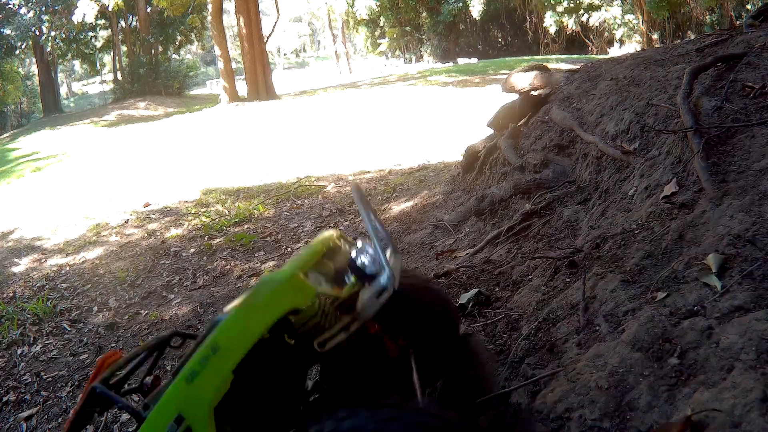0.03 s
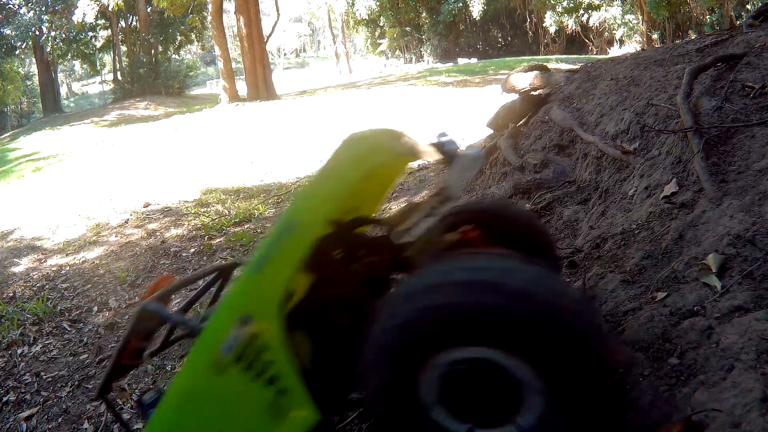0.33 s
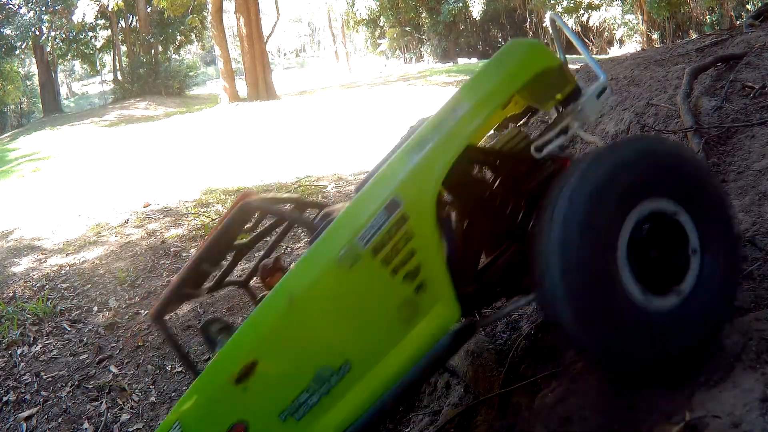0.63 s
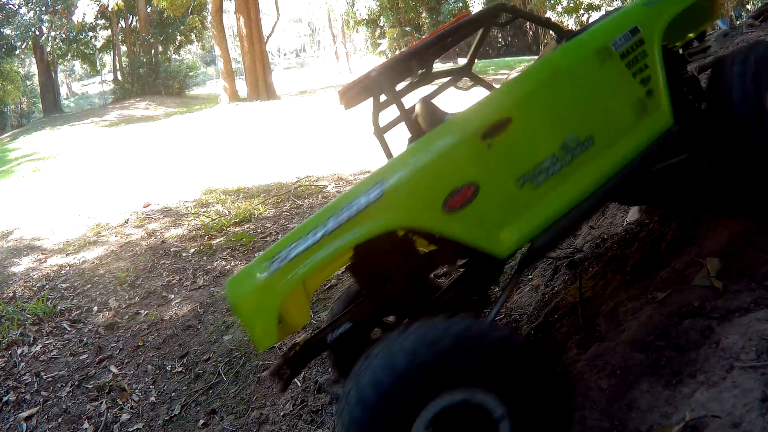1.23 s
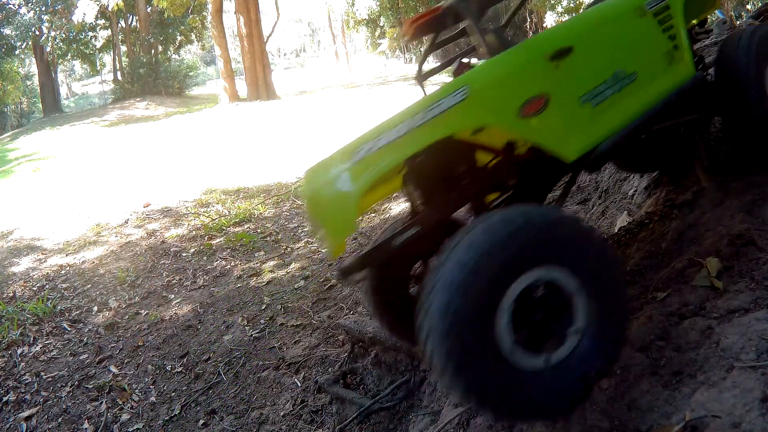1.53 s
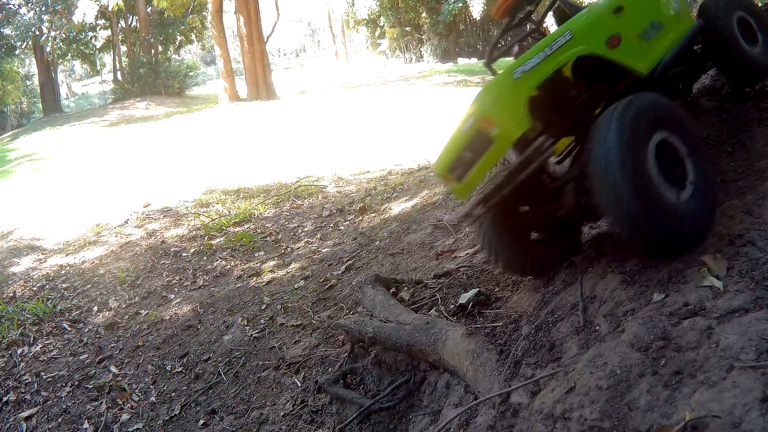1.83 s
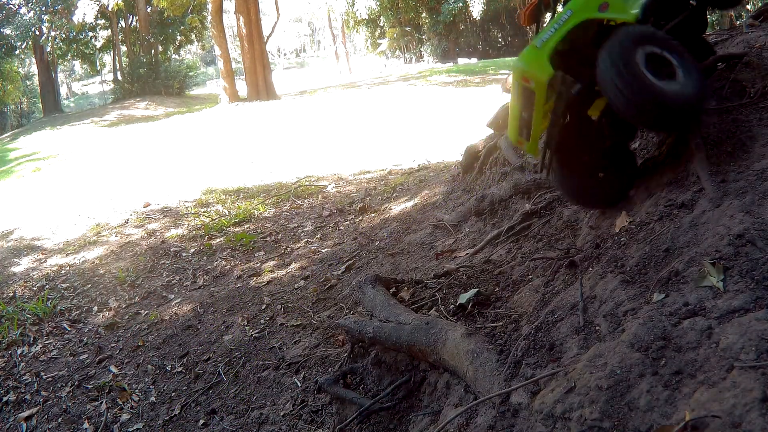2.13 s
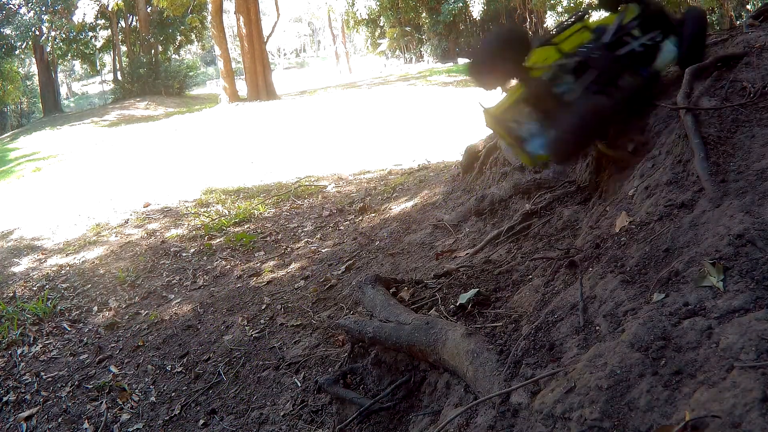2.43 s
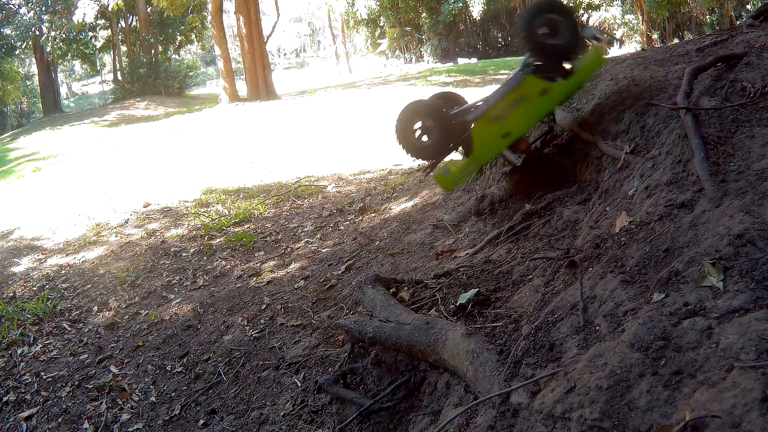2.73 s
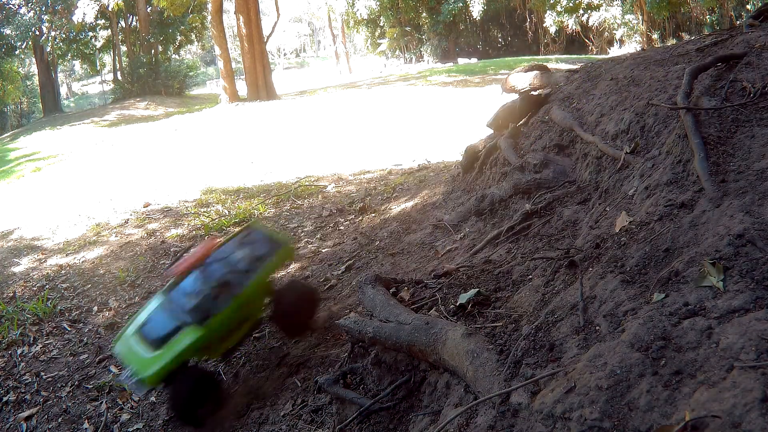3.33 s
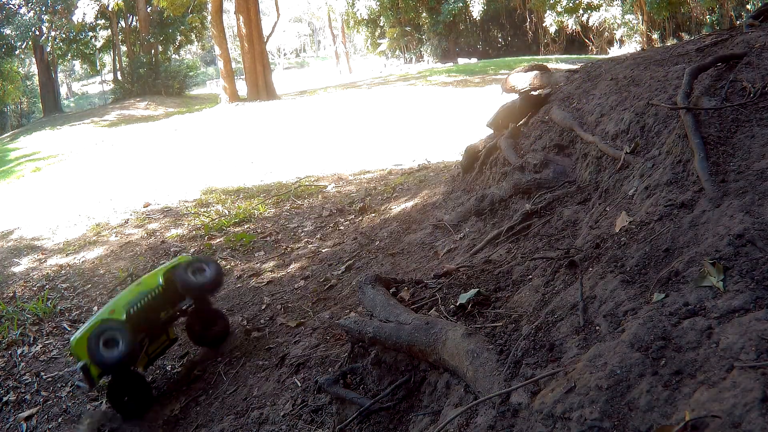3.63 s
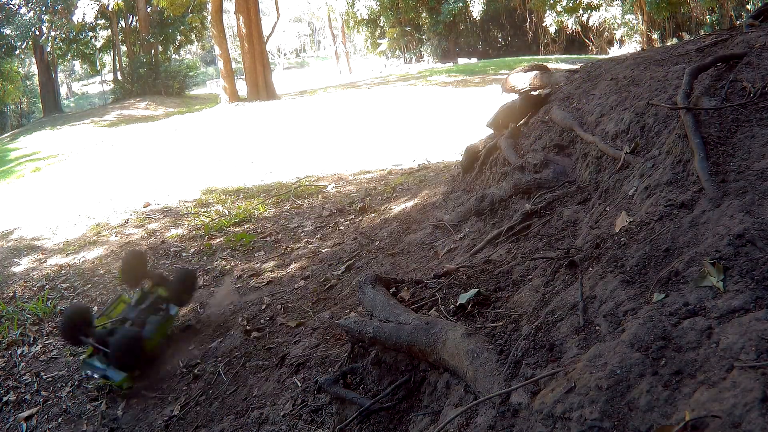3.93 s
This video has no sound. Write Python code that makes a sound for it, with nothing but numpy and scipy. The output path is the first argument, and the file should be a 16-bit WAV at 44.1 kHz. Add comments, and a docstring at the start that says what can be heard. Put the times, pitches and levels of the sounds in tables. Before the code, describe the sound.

A toy truck climbs a dirt bank outdoors, its faint gear whine wavering in pitch over crackling grit, light rattles and a few knocks, with a brief tyre hoot near 1.4 seconds. At about 2.4 seconds it flips with a loud thud and the whine stops. Thuds and plastic clacks follow, loudest around 2.6 seconds, then again near 3.2 and 3.8, over a faint distant hum.

```python
"""Toy truck on a dirt bank

Outdoors among trees, in mono: a radio-controlled truck crawls up a bank, flips and tumbles back down.
Its gears whine and sag under load, the tyres scrabble and squeak, the chassis knocks and rattles;
then tyres thud and the plastic shell clacks on the ground. Bank and trees send faint reflections
to the microphone, and a far hum lies under the open air."""
import sys
import numpy as np
from scipy import signal
from scipy.fft import rfft, irfft
from scipy.io import wavfile
from scipy.ndimage import uniform_filter1d

SR = 44100
rng = np.random.default_rng(int(sys.argv[2]) if len(sys.argv) > 2 else 0)


def int16_out(signal):
    """Quantize to a 16-bit WAV file."""
    q = np.round(np.clip(np.atleast_2d(signal).T, -1, 1) * 32767)
    wavfile.write(sys.argv[1], SR, q.astype(np.int16))


N = 176400
T = np.arange(N) / SR

# how hard the drive works, heard in rasp and grit: (time [s], level [dB])
DRIVE_LEVEL = [(0, -59), (.3, -57), (.6, -58), (.78, -65), (1.18, -57.5), (1.33, -70.5), (1.76, -60),
               (2.1, -68.5), (2.38, -61), (2.68, -62), (2.8, -70.5), (3.15, -77.5), (3.65, -63), (4, -63)]
# tyres and chassis hit the ground: (time [s], level [dB], pitch [factor])
LANDINGS = [(.595, -32, 1.16), (0.621, -33, 0.88), (.762, -35.5, 0.96), (1.198, -33, 1), (2.397, -29, 0.95),
            (2.409, -24.5, 1.06), (2.426, -18, 0.98), (2.435, -19, 0.9), (2.587, -27.5, 0.91),
            (2.597, -26.5, 0.85), (2.621, -20.5, 0.85), (2.637, -19, 1.044), (2.691, -29, 1.57),
            (2.928, -29, 0.98), (3.207, -20.5, 1.156), (3.217, -20.5, 0.94), (3.269, -32.5, 1),
            (3.439, -36.5, 1.09), (3.79, -22.5, 0.96), (3.801, -21, 0.77), (3.825, -20.5, 1.21),
            (3.844, -21.5, 1.05), (3.86, -28, 1.005)]


def from_db(db):
    """Decibels to gain."""
    return 10 ** (np.asarray(db) / 20)


def unit_power(x):
    """Scale to an RMS of 1."""
    return x / np.sqrt(np.mean(x ** 2) + 1e-20)


def curve(rows):
    """Join (time, value) points, sample by sample."""
    return np.interp(T, *np.transpose(rows))


def drift(per_s):
    """Random wander with an RMS of 1."""
    count = int(per_s * T[-1]) + 2
    return unit_power(np.interp(T * per_s, np.arange(count), rng.standard_normal(count)))


def butter(x, hz, kind="low", order=2):
    """Butterworth filter, by default a gentle low-pass."""
    return signal.sosfilt(signal.butter(order, hz, kind, fs=SR, output="sos"), x)


def colour(x, spectrum):
    """Causal filter that follows a spectrum and rolls off beyond its ends; unit power out."""
    hz, db = np.transpose(spectrum)
    f = np.maximum(np.fft.rfftfreq(2 * N, 1 / SR), 1)
    rolloff = np.minimum(f / hz[0], 1) * np.minimum(hz[-1] / f, 1)
    gain = from_db(np.interp(np.log(f), np.log(hz), db)) * np.maximum(rolloff, 1 / 20) ** 2
    cepstrum = irfft(np.log(gain))
    minimum_phase = np.exp(rfft(2 * cepstrum[:N], 2 * N))
    return unit_power(irfft(rfft(x, 2 * N) * minimum_phase)[:N])


def noise(spectrum):
    """Coloured noise of unit power."""
    return colour(rng.standard_normal(N), spectrum)


def grains(per_s, spread_db):
    """Random clicks of uneven size."""
    hits = rng.random(N) < per_s / SR
    sizes = from_db(spread_db * np.minimum(rng.exponential(1, N), 4))
    return hits * sizes * rng.choice([-1, 1], N)


def add(out, start, x):
    """Mix a sound in at a time in seconds."""
    i = max(int(start * SR), 0)
    out[i:i + len(x)] += x[:max(N - i, 0)]


def ring(modes, pitch, uneven_db=2.5):
    """One blow on a set of decaying modes, each struck a little unevenly."""
    t = T[:SR // 6]
    out = np.zeros(len(t))
    for k, (hz, db, t60) in enumerate(modes):
        decay = from_db(db + uneven_db * rng.normal() - 60 * t / t60)
        out += (-1) ** k * decay * np.sin(2 * np.pi * hz * pitch * t)
    return out


def bursts(rows, rise_s=0.0012):
    """Envelope of quick starts that die away."""
    t = T[:SR // 6]
    out = np.zeros(N)
    for start, db, t60 in rows:
        add(out, start, from_db(db - 60 * t / t60) * np.minimum(t / rise_s, 1))
    return out


def drivetrain():
    """Gears whine over a rasp, louder under load; upper partials flare on the gearbox's resonances."""
    # gear whine, sagging whenever a tyre grips: (time [s], pitch [Hz])
    gear_pitch = [(.03, 1420), (.055, 1250), (.085, 1410), (.125, 1310), (.148, 1160), (.18, 1480),
                  (.225, 1290), (.275, 1520), (.32, 1190), (.36, 1420), (.40, 1200), (.455, 1340),
                  (.487, 1160), (.515, 1450), (.545, 1290), (.575, 1480), (.612, 950), (.65, 1060),
                  (.685, 870), (.77, 780), (.835, 900), (.92, 850), (.975, 1070), (1.04, 1110),
                  (1.07, 1380), (1.135, 920), (1.18, 1390), (1.21, 1170), (1.235, 830), (1.35, 600),
                  (1.48, 750), (1.535, 910), (1.56, 880), (1.605, 1120), (1.65, 1120), (1.675, 990),
                  (1.705, 1270), (1.74, 1340), (1.76, 1250), (1.81, 1400), (1.845, 1170), (1.91, 1360),
                  (1.96, 1230), (2.08, 1340), (2.18, 1240), (2.32, 1380), (2.36, 1150)]
    # strength of the whine: (time [s], level [dB])
    whine_level = [(0, -63), (.1, -56.5), (.3, -56), (.46, -52), (.56, -59), (.65, -52), (.75, -63.5),
                   (1.11, -52.5), (1.22, -55.5), (1.35, -70), (1.55, -54), (1.67, -54), (1.8, -62),
                   (2.35, -66.5)]
    # gearbox resonances: (frequency [Hz], relative level [dB])
    gearbox = [(900, -23), (1500, -0.5), (2620, -5), (2970, -10), (4100, -5), (4990, -2.5), (5780, -10),
               (6690, 0), (8880, -15.5), (11000, -8.5), (15500, -25)]
    jitter, wobble_rad, flutter_db = 0.01391, 0.33, 4
    pinion_teeth, db_per_sag, motor_stop_s = 12, 18, 2.55
    gear_hz = uniform_filter1d(curve(gear_pitch), size=500)
    sag = np.clip(1 - gear_hz / uniform_filter1d(gear_hz, size=6000), -.12, .12)
    unsteady_hz = gear_hz * (1 + jitter * (drift(200) + .5 * drift(20)))
    phase = 2 * np.pi * np.cumsum(unsteady_hz) / SR

    def partial(ratio):
        return from_db(flutter_db * drift(70)) * np.sin(ratio * phase + wobble_rad * drift(500))

    whine = unit_power(from_db(db_per_sag * sag) * partial(1) + from_db(-11.5) * partial(2))
    mesh = np.zeros(N)
    for k in range(32, 112, 4):  # the shaft adds weaker lines between the gears' upper partials
        line_db = -6.5 if k % pinion_teeth else 0
        mesh += from_db(line_db + flutter_db * drift(20)) * partial(k / pinion_teeth)
    mesh = from_db(-3.5) * colour(mesh, gearbox)
    rasp = from_db(-4 + flutter_db * drift(70)) * noise(gearbox)
    running = np.clip((motor_stop_s - T) * 10, 0, 1)  # the tones stop, the rasp goes on
    whine *= running * from_db(curve(whine_level))
    return whine + from_db(curve(DRIVE_LEVEL)) * (rasp + running * mesh)


def rattle():
    """Small jolts shake the chassis."""
    # strength of the shaking: (time [s], level [dB])
    shake_level = [(0, -45), (.62, -42), (.82, -50), (1.18, -39), (1.35, -51.5), (1.6, -46.5), (2.1, -53.5),
                   (2.47, -39), (2.57, -48), (2.68, -34.5), (2.77, -57), (2.87, -43), (3.18, -58),
                   (3.26, -39), (3.41, -58.5), (3.445, -41.5), (3.58, -49.5), (3.76, -51.5), (3.87, -38.5),
                   (4, -58)]
    # the chassis' answer to a jolt: (frequency [Hz], relative level [dB])
    jolt_spectrum = [(70, -20.5), (140, -10), (220, -4), (300, 1.5), (400, -1), (520, -10.5), (1300, -28),
                     (4000, -41.5)]
    return from_db(curve(shake_level)) * colour(grains(per_s=600, spread_db=2.5), jolt_spectrum)


def dirt():
    """Stones tick on the truck, grit crackles under the tyres, landings and skids shove soil."""
    # stone strikes: (time [s], level [dB], t60 [s])
    ticks = [(.043, -48, 0.24), (.086, -43, 0.017), (.213, -45, 0.02), (.266, -41.5, 0.022),
             (.377, -43, 0.042), (1.093, -41.5, 0.02), (1.615, -47, 0.028), (3.8, -51.5, 0.17),
             (3.93, -47, .023)]
    # stones and grit: (frequency [Hz], relative level [dB])
    stone_spectrum = [(2500, -14), (4200, -1.5), (5200, 0), (7500, -0.5), (10000, -6), (12500, -3),
                      (15000, -35)]
    # the truck slides: (time [s], length [s], level [dB])
    skids = [(2.474, 0.093, -49.5), (3.218, 0.043, -46.5), (3.778, 0.09, -45.5)]
    # shoved soil: (frequency [Hz], relative level [dB])
    soil_spectrum = [(400, -11), (750, 0.5), (1100, -17.5), (2400, -28.5)]
    grit_db, scuff_db, scuff_t60_s = -7, -20.5, 0.047
    grit = colour(grains(per_s=260, spread_db=4), stone_spectrum)
    grit *= from_db(curve(DRIVE_LEVEL) + grit_db)
    shove = bursts([(start, db + scuff_db, scuff_t60_s) for start, db, _ in LANDINGS])
    for start, length, db in skids:
        add(shove, start, from_db(db) * np.hanning(int(length * SR)))
    return noise(stone_spectrum) * bursts(ticks) + grit + noise(soil_spectrum) * shove


def outdoors():
    """Still air around the microphone and a far, wavering hum."""
    # open air: (frequency [Hz], relative level [dB])
    air_spectrum = [(25, -5.5), (75, -1.5), (140, -6), (368, -3), (703, -18.5), (1200, -16.5), (3000, -29),
                    (11800, -35.5), (15500, -44)]
    air_db, hum_db, hum_hz = -53, -57.5, 91.95
    hum = np.sqrt(2) * np.sin(2 * np.pi * np.cumsum(hum_hz + 1.84 * drift(8.08)) / SR)
    return from_db(air_db) * noise(air_spectrum) + from_db(hum_db + 1.5 * drift(6.2)) * hum


def thuds():
    """Soft blows ring the chassis, which radiates little bass; the suspension stop knocks dully."""
    # chassis on its tyres: (frequency [Hz], level [dB], t60 [s])
    chassis_modes = [(181, -14, 0.055), (245, -12.5, 0.044), (306.5, 3.5, 0.062), (382.6, -8.5, 0.066),
                     (467, -7.5, 0.056), (601, -13, 0.059), (758, -14, 0.021)]
    # the suspension hits its stop: (time [s], level [dB])
    bumps = [(0.275, -25), (1.252, -19)]
    # ring of the stop: (base frequency [Hz], level [dB], t60 [s])
    stop_modes = [(297, 3, .014), (445, 7.5, 0.0089), (670, -8.5, .012)]
    attack_s = 0.00084
    squash = 1 - np.exp(-T[:SR // 6] / attack_s)
    out = np.zeros(N)
    for start, db, pitch in LANDINGS:
        add(out, start, from_db(db) * butter(squash * ring(chassis_modes, pitch), hz=590))
    for start, db in bumps:
        add(out, start, from_db(db) * ring(stop_modes, pitch=0.97))
    return butter(out, hz=157, kind="high")


def squeaks(fall=0.085, jitter=0.029):
    """A slipping tyre hoots or the gears squeal briefly, unsteady and falling in pitch."""
    # tyre hoots and gear squeals: (time [s], length [s], centre pitch [Hz], level [dB])
    squeals = [(0.479, .035, 5000, -51), (0.552, 0.031, 4580, -51), (1.159, .045, 4300, -55.5),
               (1.392, 0.056, 382, -29.5), (2.14, .065, 3940, -65), (2.338, 0.045, 3330, -59),
               (3.665, 0.06, 380, -38)]
    out = np.zeros(N)
    for start, length, hz, db in squeals:
        progress = np.linspace(0, 1, int(length * SR))
        bend = 1 + fall * (.5 - progress) + jitter * drift(1000)[:len(progress)]
        phase = 2 * np.pi * np.cumsum(hz * bend) / SR
        add(out, start, from_db(db) * np.sin(np.pi * progress) * np.sin(phase))
    return out


def clacks():
    """The plastic shell slaps the dirt with a short ring and a crunch."""
    # shell hits the ground: (time [s], relative level [dB], pitch [factor])
    slaps = [(.638, -39.5, 1.7), (.663, -39.5, 1.3), (2.398, -38, 1), (2.599, -28, 0.86),
             (2.628, -19, 0.96), (2.632, -27.5, 1.25), (2.646, -18.5, 0.99), (2.655, -27.5, 1.06),
             (2.692, -28, 0.8), (3.061, -32.5, 1.5), (3.794, -30.5, 0.92), (3.825, -31, 0.83),
             (3.915, -37, 0.95)]
    # ring of the shell: (frequency [Hz], level [dB], t60 [s])
    shell_modes = [(569, -4, 0.033), (760, -1.5, 0.035), (886, 0, 0.042), (1245, -4, 0.031),
                   (1488, -5, 0.04), (1804, -14.5, 0.048), (2270, -15.5, 0.05)]
    # noisy part of a slap: (frequency [Hz], relative level [dB])
    crunch_spectrum = [(500, 9.5), (850, 1.5), (2200, -5), (3000, -21.5), (5000, -7), (7500, -15),
                       (15000, -25.5)]
    ring_db, crunch_db, crunch_t60_s = -8, -12.5, 0.046
    rings = np.zeros(N)
    for start, db, pitch in slaps:
        add(rings, start, from_db(db + ring_db) * ring(shell_modes, pitch))
    crunch_envelope = bursts([(start, db + crunch_db, crunch_t60_s) for start, db, _ in slaps])
    return rings + noise(crunch_spectrum) * crunch_envelope


def sharp_tick(start_s=3.209, db=-32, t60_s=0.012):
    """One loud, dry tick as the truck lands."""
    treble = butter(rng.standard_normal(N), hz=[4800, 8200], kind="band", order=4)
    return unit_power(treble) * bursts([(start_s, db, t60_s)])


def reflections(x, db=-12, t60_s=0.13, cut_hz=6700):
    """Bank and trees scatter a dull, faint tail that reaches the microphone 10 ms late."""
    t = T[:SR // 2]
    tail = butter(rng.standard_normal(len(t)), cut_hz) * from_db(-60 * t / t60_s) * (t > .01)
    tail /= np.sqrt(np.sum(tail ** 2) * SR / 2 / cut_hz)  # about unit gain below the cut
    return from_db(db) * signal.fftconvolve(x, tail)[:N]


def scene():
    """The truck on the bank in the open air, heard at one microphone."""
    truck = thuds() + clacks() + sharp_tick() + drivetrain() + rattle() + dirt() + squeaks()
    return (truck + reflections(truck) + outdoors())[None]


def record(dry):
    """The top treble is cut steeply."""
    cutoff_hz = 15700
    return signal.sosfilt(signal.ellip(10, .2, 80, cutoff_hz, fs=SR, output="sos"), dry)


dry = scene()
out = record(dry)
int16_out(out)
```